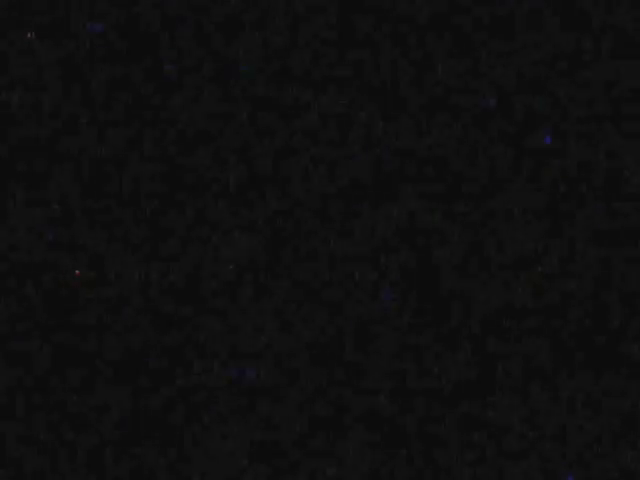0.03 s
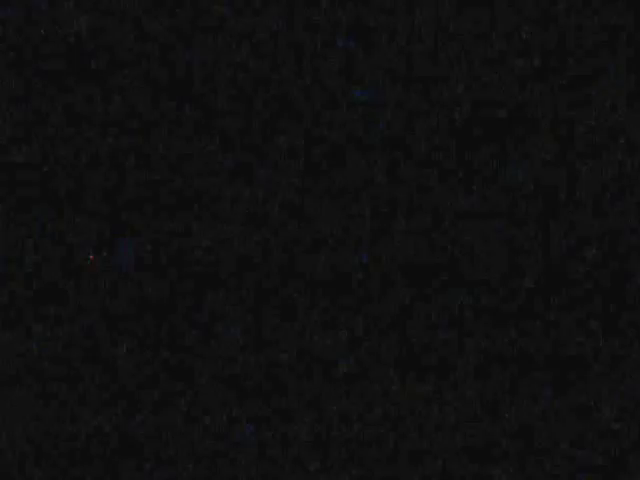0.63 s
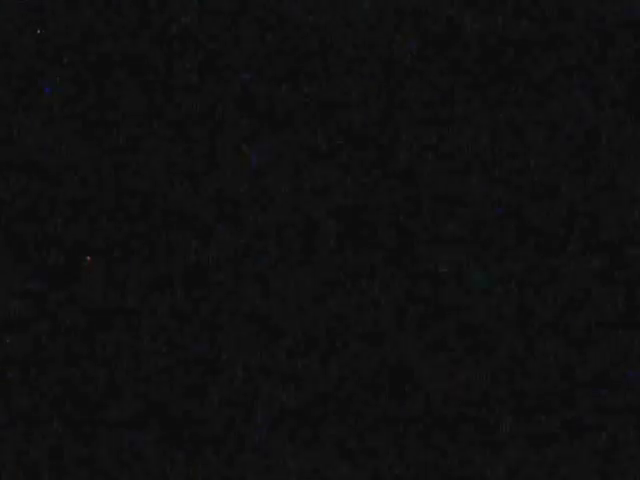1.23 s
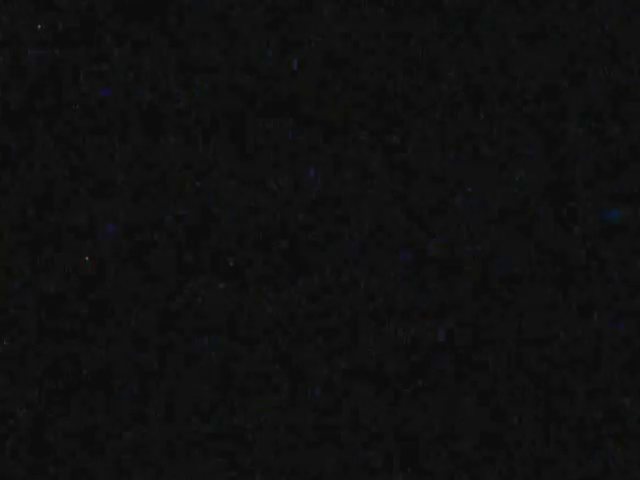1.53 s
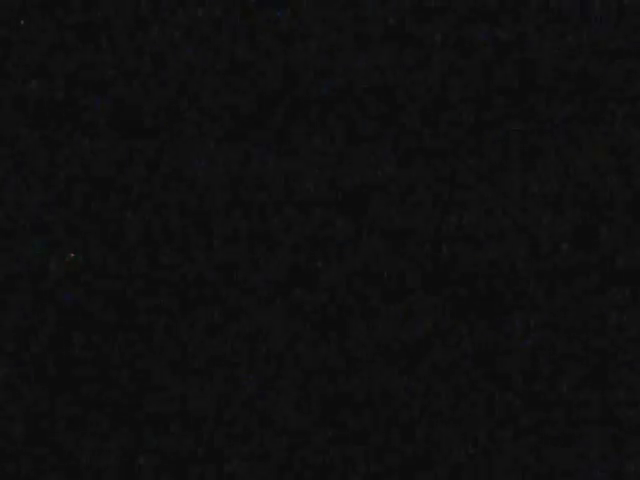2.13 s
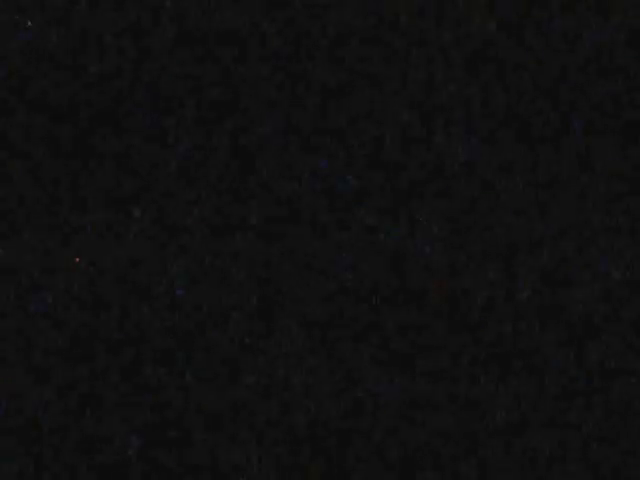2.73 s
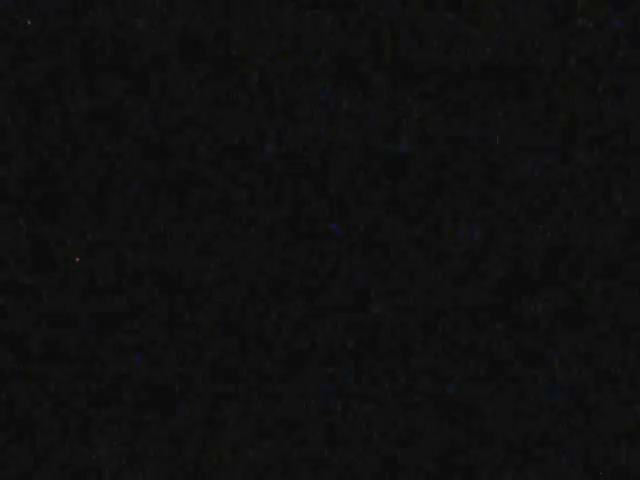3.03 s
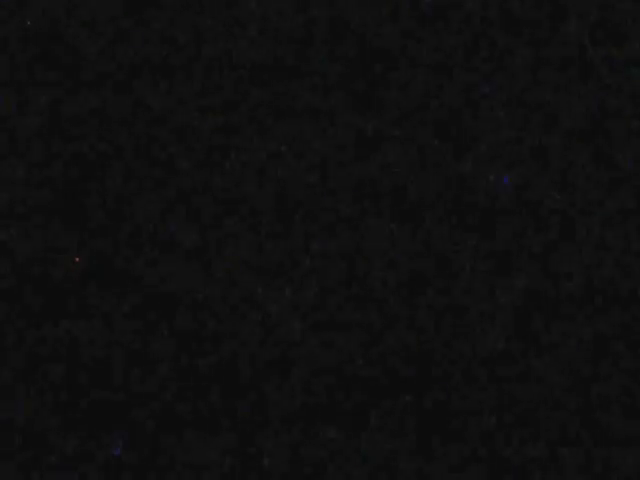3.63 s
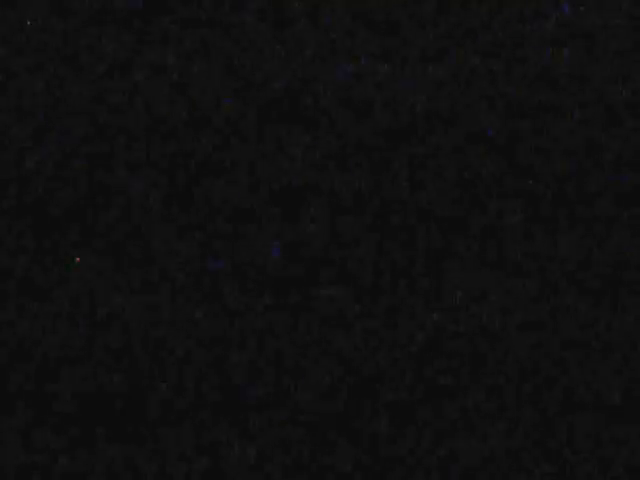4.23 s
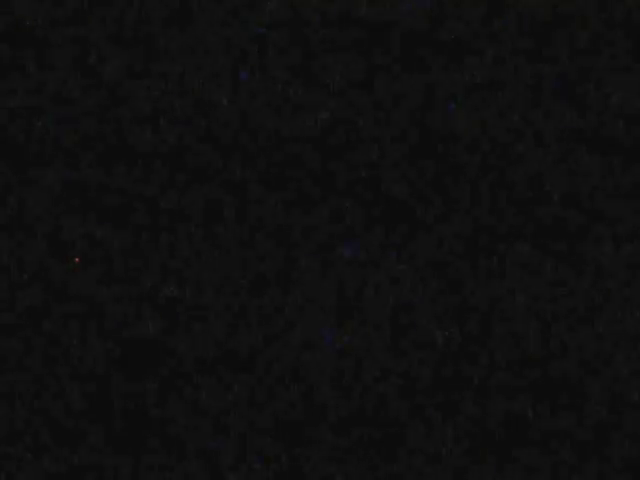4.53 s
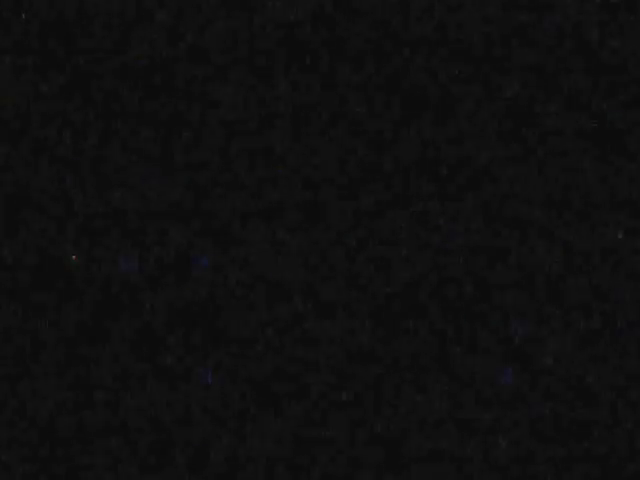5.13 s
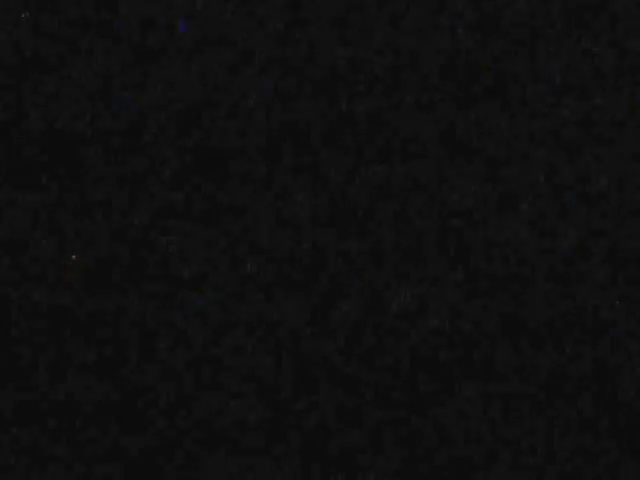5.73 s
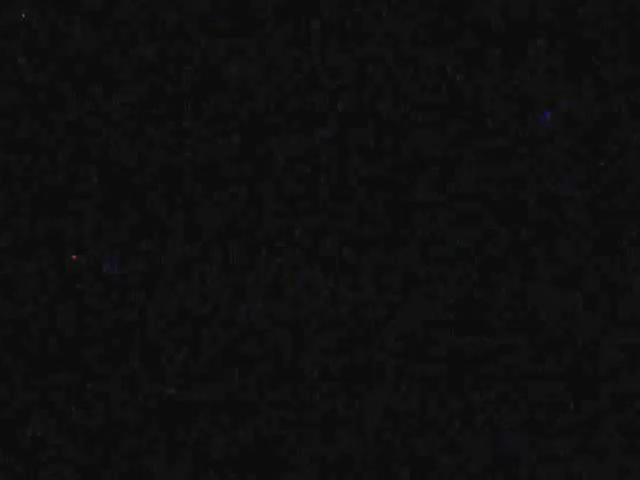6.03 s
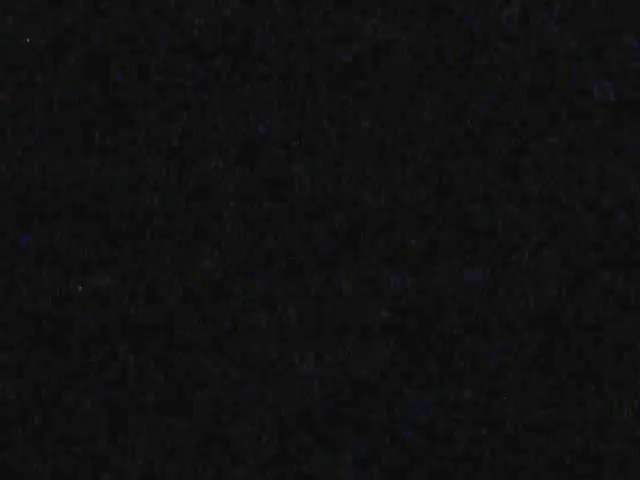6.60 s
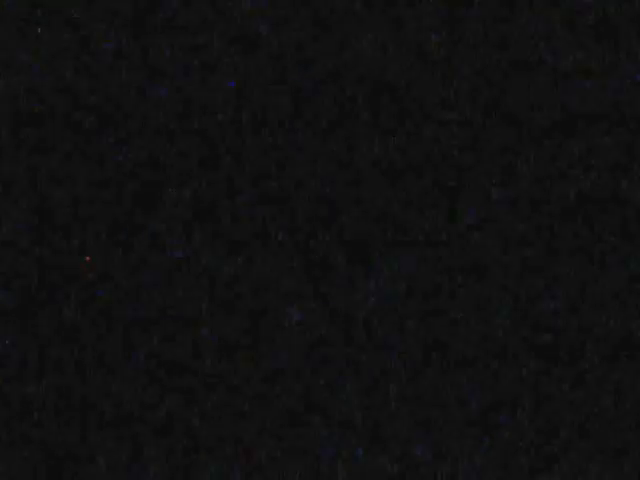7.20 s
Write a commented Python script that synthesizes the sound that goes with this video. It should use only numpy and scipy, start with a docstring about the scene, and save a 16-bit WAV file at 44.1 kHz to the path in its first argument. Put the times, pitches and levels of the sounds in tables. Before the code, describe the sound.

A distant animal yelps and lets out high, raspy screams in a wood at night, while frogs peep and trill.

```python
"""Screams in a night wood.

A far animal screams: runs of short yelps lead into high wails that break into rasps and ring on
among the trees. Frogs give rising peeps and a low trill. Three small ticks, soft microphone bumps,
a faint low drone and hiss lie underneath."""
import sys
import numpy as np
from scipy import signal
from scipy.fft import rfft, irfft
from scipy.io import wavfile

SR = 44100
rng = np.random.default_rng(int(sys.argv[2]) if len(sys.argv) > 2 else 0)


def to_wav(s):
    """Save 16-bit WAV."""
    ch = np.atleast_2d(s).T  # columns
    pcm = np.round(np.clip(ch, -1, 1) * 32767)  # PCM
    wavfile.write(sys.argv[1], SR, pcm.astype(np.int16))


N = 320166
TIME_S = np.arange(N) / SR
BINS_HZ = np.maximum(np.arange(N // 2 + 1) * SR / N, 1)


def screams(waver=0.014, jitter=0.06, catch_db=3.5, shimmer_db=2.0, narrow_hz=250, wide_hz=600):
    """A near-whistling larynx; under strain its cycles turn irregular and turbulence takes over."""
    # throat and mouth resonance: freq_hz, gain_db
    throat = [(900, -39), (1400, -11), (1900, -28), (2500, 3.5), (3300, 4.5), (4400, -0.5), (5400, -10.5),
              (6300, -16.5), (7500, -32.5)]
    # start_s, length_s, top_hz, fundamental_db, octave_db, roughness (0-1)
    yelps = [(.292, .026, 1833, -62, -43, 0.13), (0.323, .045, 2040, -48.5, -50, 0.1),
             (.375, .06, 1700, -57, -44.5, 0.26), (0.975, 0.041, 1820, -65, -45.5, .15),
             (1.024, .03, 2000, -56, -47, .1), (1.069, .05, 2030, -48, -47.5, 0.14),
             (1.136, 0.099, 1833, -53.5, -45, 0.53), (2.05, .085, 1960, -44.5, -53.5, 0.56),
             (2.155, .08, 2760, -37.5, -58.5, 0.14), (2.25, .1, 1900, -47.5, -53, 0.36),
             (2.865, 0.037, 2490, -42, -44.5, 0.32), (2.915, .04, 2647, -38.5, -51, 0.23),
             (2.97, 0.045, 2020, -39.5, -48.5, 0.12), (3.032, 0.032, 2273, -38, -45, 0.35),
             (3.076, .065, 2560, -42.5, -46.5, 0.25), (3.148, 0.062, 1720, -45.5, -48, 0.13),
             (3.75, .05, 2780, -36.5, -64, 0.19), (3.815, .08, 2900, -38.5, -66, 0.34),
             (4.031, 0.036, 2230, -51, -48, 0.37), (4.074, .11, 2217, -43.5, -49, 0.42),
             (4.83, 0.072, 2100, -35.5, -46.5, 0.57), (4.9, 0.023, 2660, -27, -46, 0.31),
             (4.936, .065, 2200, -35, -48.5, 0.79), (5.013, 0.068, 1750, -40, -59, 0.92),
             (5.095, .05, 1750, -36.5, -51, 0.84), (6.898, .018, 1500, -50.5, -50, 0.95)]
    # wail curves: time_s, pitch_hz, fundamental_db, octave_db, roughness (0-1)
    climbing = [(1.26, 1960, -45, -42, 0.32), (1.29, 2043, -39, -47, 0.31), (1.405, 2250, -36.5, -46, 0.35),
                (1.424, 2460, -24.5, -37, 0), (1.445, 2230, -35, -38.5, 0.29), (1.48, 2198, -38, -49, 0.26),
                (1.57, 2116, -42, -50, 0.08), (1.63, 1880, -43.5, -46, 0.42)]
    high = [(3.21, 2050, -51, -52, 0.61), (3.24, 2830, -40, -44.5, 0.23), (3.29, 2954, -40.5, -45, 0.22),
            (3.325, 2882, -31, -48, 0.24), (3.36, 2402, -39.5, -49, 0.41), (3.41, 2200, -33.5, -49, .25),
            (3.46, 2159, -37.5, -52, 0.47)]
    long = [(4.56, 1757, -55, -52, 1), (4.601, 2124, -45, -48, 0.46), (4.665, 2241, -31.5, -49, .15),
            (4.72, 2474, -37, -55.5, 0.19), (4.779, 2583, -34, -41, 0.21), (4.821, 2354, -30, -61, 0.6)]
    screech = [(5.24, 1692, -50, -53, 0.88), (5.265, 1950, -44, -45, 0.96), (5.298, 2146, -44, -45, 0.79),
               (5.308, 2102, -40, -43, .12), (5.322, 1840, -35, -31, .08), (5.342, 1362, -52, -52, 0.36)]
    arched = [(5.62, 1200, -47.5, -44, 0.31), (5.655, 1760, -41, -49, 0.48), (5.7, 1900, -35, -58, .3),
              (5.73, 2190, -34.5, -47, 0.45), (5.79, 2290, -28.5, -49, 0.51),
              (5.82, 1930, -38, -37.5, 0.447), (5.845, 1600, -30, -50, 0.13), (5.89, 1590, -40, -40, 0.42)]
    hoarse = [(5.92, 1845, -36.5, -48, 0.32), (5.99, 2029, -36, -42.5, 0.5), (6.025, 2625, -32.5, -42, .3),
              (6.06, 2358, -28.5, -43.5, 0.62), (6.11, 2458, -35, -42, 0.53), (6.17, 2394, -37, -40, 0.49)]
    loud = [(6.188, 2850, -32, -56, 0.082), (6.212, 2864, -31, -46, 0.088),
            (6.232, 2767, -36.5, -47.5, 0.21), (6.29, 2630, -25, -47.5, 0.32),
            (6.365, 2670, -27.5, -39, 0.64), (6.407, 2445, -28.5, -43, 0.64), (6.459, 2594, -42, -44.5, .7),
            (6.525, 2627, -26, -41, 0.69), (6.585, 1650, -45, -63, 0.31)]
    last = [(6.936, 1797, -56, -46, 0.086), (6.956, 1826, -40.5, -41.5, .03), (7.05, 1747, -41, -39, 0.18),
            (7.15, 1716, -48, -65, 0.17)]
    calls = [climbing, high, long, screech, arched, hoarse, loud, last]
    calls += [yelp_curve(*row) for row in yelps]
    knots_s, *columns = np.transpose(sorted(tuple(row) for call in calls for row in call))
    pitch_hz, fundamental_db, octave_db, rough = [np.interp(TIME_S, knots_s, c) for c in columns]
    gates = sum(gate(call[0][0], call[-1][0], rise_s=0.0073, fall_s=0.022) for call in calls)
    wobble = 1 + waver * drift(50) + jitter * rough * drift(160)
    phase = 2 * np.pi * np.cumsum(pitch_hz * wobble) / SR
    # the voice catches, each of the two low partials in its own way
    fundamental = from_db(fundamental_db + catch_db * drift(51)) * np.sin(phase)
    octave = from_db(octave_db - 1.5 + catch_db * drift(40)) * np.sin(2 * phase)
    # on high notes the third partial leaves the throat's range
    third_db = (fundamental_db + octave_db) / 2 - 5 + at_hz(throat, 3 * pitch_hz)
    tone = np.sqrt(2) * (fundamental + octave + from_db(third_db) * np.sin(3 * phase))
    # irregular cycles smear the fundamental, wider with strain
    band = (1 - rough) * noise_band(phase, narrow_hz) + rough * noise_band(phase, wide_hz)
    skirt = from_db(fundamental_db + 3.5) * band
    # turbulence grows with brightness and strain
    brightness = 0.19 * from_db(fundamental_db) + from_db(octave_db)
    rasp = brightness * from_db(5.5) * rough ** 0.2 * noise(throat)
    flutter = from_db(shimmer_db * rough * drift(59))
    return np.minimum(gates, 1) * flutter * ((1 - rough ** 2) * tone + rough * (skirt + rasp))


def yelp_curve(start_s, length_s, top_hz, fundamental_db, octave_db, rough, scoop=0.065, drop=0.05):
    """Pitch and level arch together, cresting midway. Rows as in a wail curve."""
    progress = np.linspace(0, 1, 12)
    before_crest = np.maximum(1 - 2 * progress, 0) ** 2
    after_crest = np.maximum(2 * progress - 1, 0) ** 2
    pitch_hz = top_hz * (1 - scoop * before_crest - drop * after_crest)
    arch_db = -5 * (before_crest + after_crest)
    return [(start_s + length_s * p, hz, fundamental_db + db, octave_db + db, rough)
            for p, hz, db in zip(progress, pitch_hz, arch_db)]


def frog_peeps(usual_hz=2504, glide_hz_per_s=2780):
    """Pure upward glides that swell and stop, higher ones faster; far frogs are mostly echo."""
    # start_s, length_s, start_hz, level_db, echo_gain_db
    peeps = [(.09, .17, 2477, -50, -1), (0.758, 0.16, 2520, -46.5, -2.5), (1.632, .17, 2520, -45.5, -6.5),
             (2.521, 0.17, 2505, -45, -6), (3.54, 0.14, 2570, -45, -12), (4.253, 0.16, 2475, -51, 0),
             (4.602, 0.12, 2600, -45, -7), (5.446, .1, 2621, -48, 14), (5.782, 0.069, 2975, -28.5, -5),
             (6.733, .15, 2573, -43, 7.5), (6.954, 0.077, 2957, -29, -7)]
    direct, scattered = np.zeros(N), np.zeros(N)
    for start_s, length_s, start_hz, level_db, echo_gain_db in peeps:
        progress = np.linspace(0, 1, int(length_s * SR))
        rise_hz = glide_hz_per_s * length_s * (start_hz / usual_hz) ** 2
        phase = 2 * np.pi * np.cumsum(start_hz + rise_hz * progress) / SR
        swell = np.abs(np.sin(np.pi * progress ** 1.6)) ** 0.19
        peep = np.sqrt(2) * from_db(level_db) * swell * np.sin(phase)
        span = round(start_s * SR) + np.arange(len(peep))
        direct[span] += peep
        scattered[span] += from_db(echo_gain_db) * peep
    return direct + wood_echo(scattered)


def far_frog_chorus(pitch_hz=2870, width_hz=150, level_db=-53, t60_s=3.1):
    """A faint band of distant frog voices around 2.9 kHz fades slowly away."""
    return from_db(level_db - 60 * TIME_S / t60_s) * noise_band(2 * np.pi * pitch_hz * TIME_S, width_hz)


def frog_trill(pitch_hz=1548, pulse_hz=28.54, sweep_hz=25, uneven_db=3, echo_db=-4):
    """A vocal sac pulses on one note."""
    # time_s, level_db
    levels = [(0, -56), (1, -54.5), (2, -55.5), (3, -55.5), (3.9, -54.5), (4.3, -63), (4.5, -86)]
    beat = 2 * np.pi * np.cumsum(pulse_hz * (1 + 0.054 * drift(3))) / SR
    phase = 2 * np.pi * np.cumsum(pitch_hz + sweep_hz * np.sin(beat) + 8 * drift(14.5)) / SR
    pulses = (1 + np.cos(beat)) * from_db(uneven_db * drift(16.4))
    note = unit_rms(pulses * np.sin(phase)) * from_db(np.interp(TIME_S, *np.transpose(levels)))
    return note + from_db(echo_db) * wood_echo(note)


def ticks(crack_db=-13):
    """Small dry snaps close by: a crack and one quickly damped ring."""
    # start_s, level_db, ring_hz, t30_s
    snaps = [(2.393, -15.5, 3120, 0.0027), (4.243, -32.5, 1493, 0.0081), (6.444, -27, 5590, 0.0028)]
    out = np.zeros(N)
    for start_s, level_db, ring_hz, t30_s in snaps:
        age_s = np.maximum(TIME_S - start_s, 0)
        body = np.sin(2 * np.pi * ring_hz * age_s) + from_db(crack_db) * rng.standard_normal(N)
        out += (age_s > 0) * from_db(level_db - 30 * age_s / t30_s) * body
    return out


def bumps(ring_hz=48, t60_s=0.065, faint_per_s=1.0, faint_db=-54):
    """Soft knocks on the microphone body, each a heavily damped low swing."""
    # start_s, impulse_db
    firm_knocks = [(0.018, -40), (0.278, -41), (1.919, -46), (2.879, -43), (3.209, -41), (3.309, -41),
                   (6.659, -40)]
    knocks = from_db(faint_db) * (rng.random(N) < faint_per_s / SR)
    for start_s, impulse_db in firm_knocks:
        knocks[round(start_s * SR)] = from_db(impulse_db)
    age_s = TIME_S[:SR]
    swing = from_db(-60 * age_s / t60_s) * np.sin(2 * np.pi * ring_hz * age_s)
    return signal.fftconvolve(knocks, swing)[:N]


def drone(low_hz=203, high_hz=318, width_hz=22, high_gain_db=-8):
    """Two distant low resonances swell and sink together."""
    # time_s, level_db
    levels = [(0, -60.5), (1.9, -64), (2.15, -54.5), (2.8, -60), (3.5, -59), (4.2, -62.5), (4.8, -55),
              (5.4, -60), (6.2, -58.5), (7.26, -58.5)]
    low = noise_band(2 * np.pi * low_hz * TIME_S, width_hz)
    high = from_db(high_gain_db) * noise_band(2 * np.pi * high_hz * TIME_S, width_hz)
    return from_db(np.interp(TIME_S, *np.transpose(levels))) * (low + high)


def night_air(level_db=-48):
    """Steady air and microphone hiss."""
    # freq_hz, relative_db
    spectrum = [(20, -9), (70, -2), (130, 3), (170, 1), (220, -0.5), (310, 0), (600, -1.5), (1300, -5),
                (2600, -7), (4000, -11), (5500, -18), (8500, -21), (13200, -23.5), (14600, -20.5)]
    return from_db(level_db) * noise(spectrum)


def wood_echo(x, build_s=0.0076, early_db=6.5, early_s=0.013):
    """Trunks scatter sound into a dense tail; each band dies at its own rate."""
    # freq_hz, t60_s
    ring_times = [(1000, 0.66), (2000, 1.61), (3000, 1.35), (4500, 0.72), (7000, 1.44)]
    centres_hz, t60s_s = np.transpose(ring_times)
    age_s, freq_hz = TIME_S[:2 * SR], np.arange(SR + 1) / 2
    white = rfft(rng.standard_normal(len(age_s)))
    tail = 0
    for weights, t60_s in zip(np.eye(len(centres_hz)), t60s_s):
        band = irfft(white * np.interp(freq_hz, centres_hz, weights))
        tail += band * from_db(-60 * age_s / t60_s)
    tail *= (1 - np.exp(-age_s / build_s)) * from_db(early_db * np.exp(-age_s / early_s))
    voice_band = (freq_hz > 1500) & (freq_hz < 3500)
    tail /= np.sqrt(np.mean(np.abs(rfft(tail)[voice_band]) ** 2))
    return signal.fftconvolve(x, tail)[:N]


def from_db(db):
    """Decibels to gain."""
    return 10 ** (np.asarray(db) / 20)


def unit_rms(x):
    """Scale to unit rms."""
    return x / np.sqrt(np.mean(x ** 2) + 1e-20)


def at_hz(spectrum, hz):
    """Read a spectrum table on a log-frequency axis."""
    freq_hz, gain_db = np.transpose(spectrum)
    return np.interp(np.log(hz), np.log(freq_hz), gain_db)


def noise(spectrum):
    """Unit-rms coloured noise."""
    return unit_rms(irfft(rfft(rng.standard_normal(N)) * from_db(at_hz(spectrum, BINS_HZ)), N))


def drift(rate_hz):
    """Unit-rms random wander, rolled off above rate_hz."""
    return unit_rms(irfft(rfft(rng.standard_normal(N)) / (1 + (BINS_HZ / rate_hz) ** 4), N))


def noise_band(phase, width_hz):
    """Unit noise band reaching width_hz either side of a carrier."""
    return drift(width_hz) * np.sin(phase) + drift(width_hz) * np.cos(phase)


def gate(start_s, end_s, rise_s, fall_s):
    """Opens before start_s, closes after end_s."""
    return np.clip(1 + (TIME_S - start_s) / rise_s, 0, 1) * np.clip(1 + (end_s - TIME_S) / fall_s, 0, 1)


def scene(scream_gain_db=-1.5):
    """Far screams, about as much echo as direct sound, over frogs and background."""
    voice = screams()
    far_voice = from_db(scream_gain_db) * (voice + wood_echo(voice))
    frogs = frog_peeps() + far_frog_chorus() + frog_trill()
    return (far_voice + frogs + ticks() + bumps() + drone() + night_air())[None, :]


def record(dry, notch_hz=7836, notch_width_hz=1380, cutoff_hz=15800):
    """The microphone has one deep treble notch; the top is cut."""
    notched = signal.lfilter(*signal.iirnotch(notch_hz, notch_hz / notch_width_hz, fs=SR), dry)
    return signal.sosfilt(signal.ellip(12, 0.1, 80, cutoff_hz, fs=SR, output="sos"), notched)


dry = scene()
out = record(dry)
to_wav(out)
```